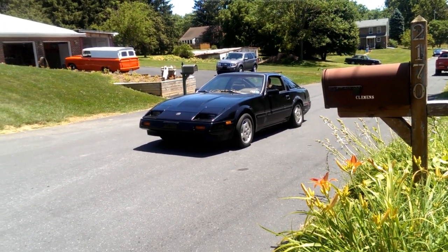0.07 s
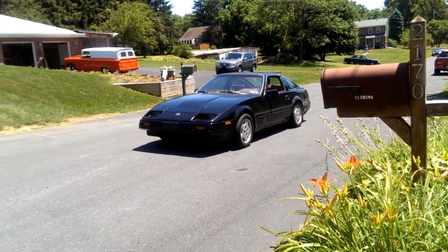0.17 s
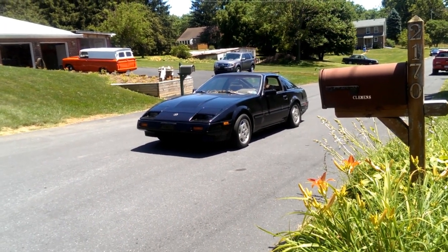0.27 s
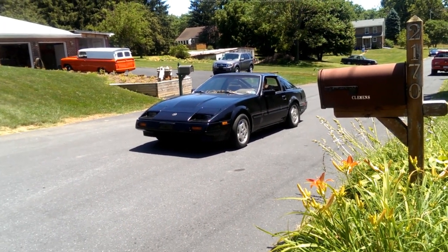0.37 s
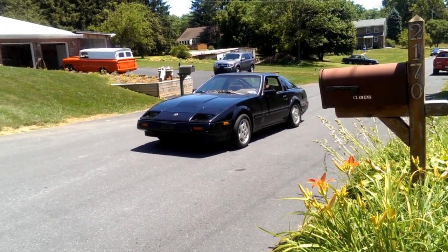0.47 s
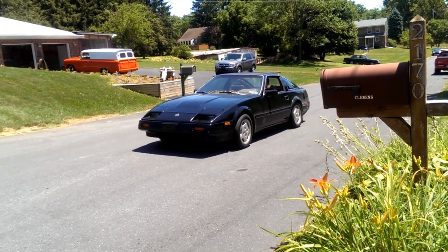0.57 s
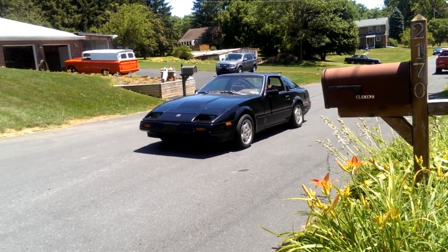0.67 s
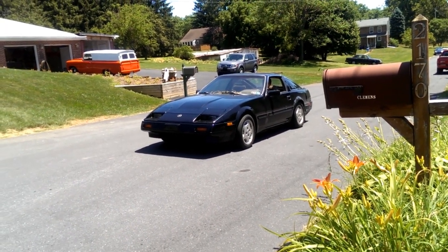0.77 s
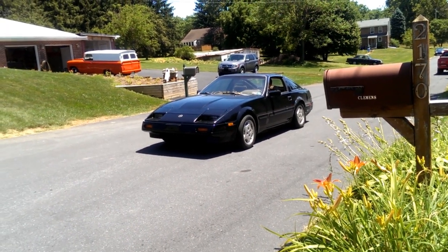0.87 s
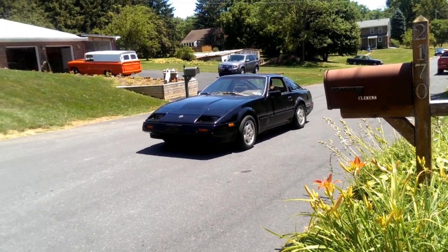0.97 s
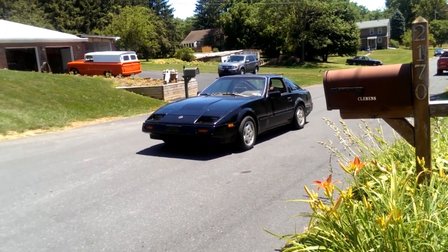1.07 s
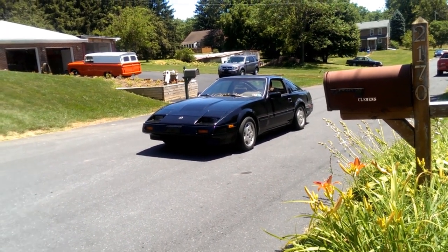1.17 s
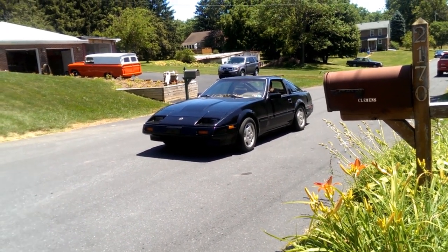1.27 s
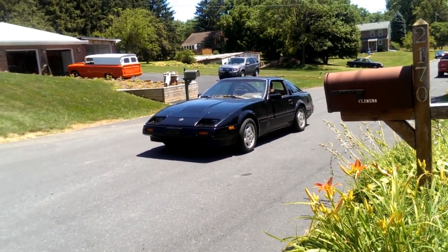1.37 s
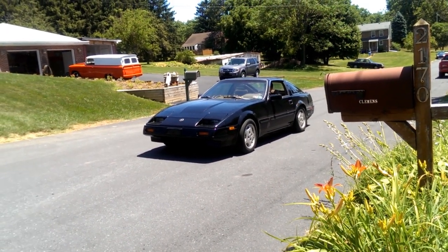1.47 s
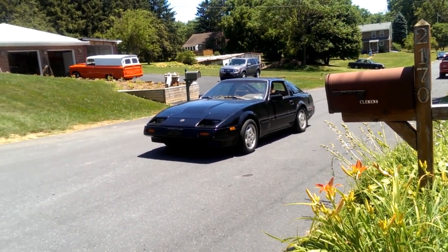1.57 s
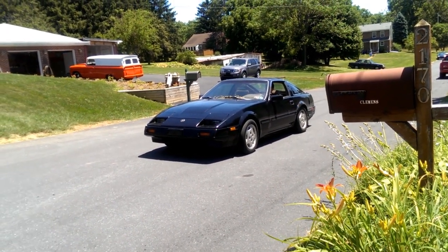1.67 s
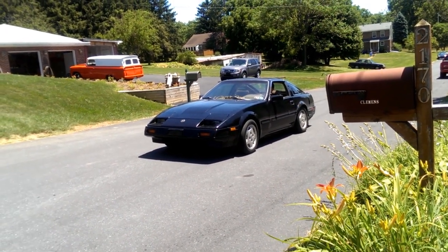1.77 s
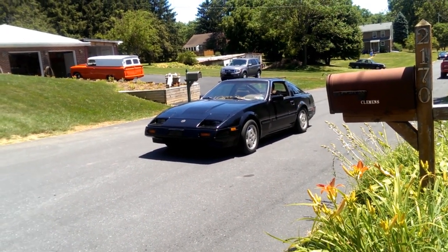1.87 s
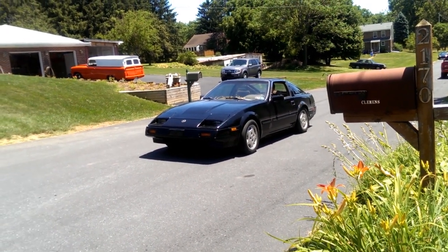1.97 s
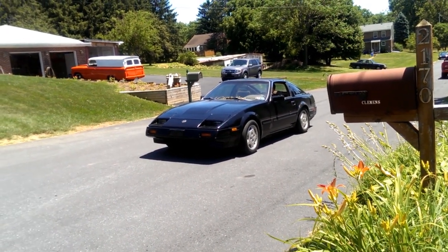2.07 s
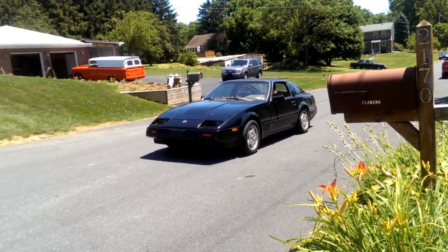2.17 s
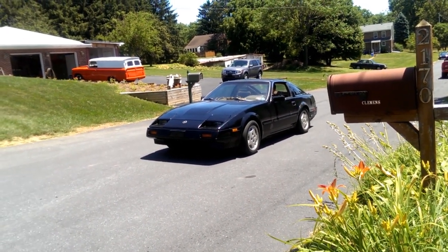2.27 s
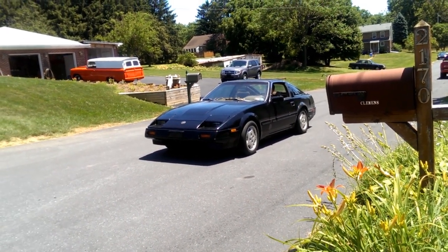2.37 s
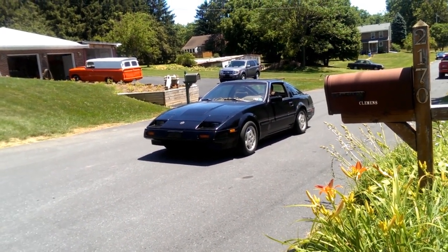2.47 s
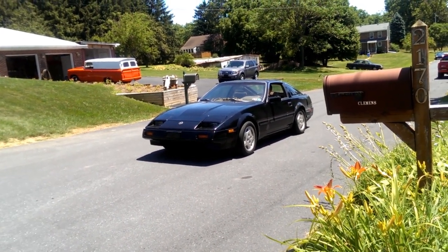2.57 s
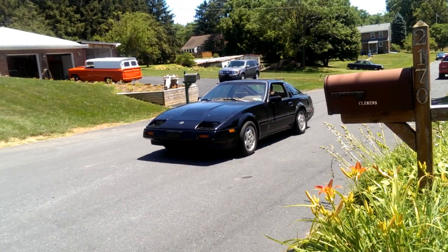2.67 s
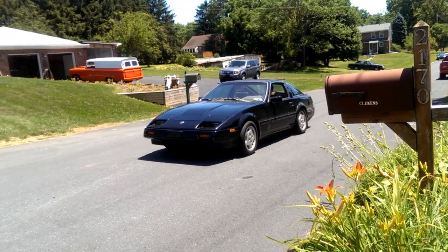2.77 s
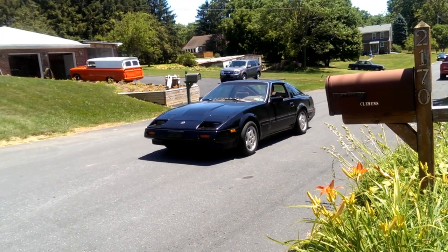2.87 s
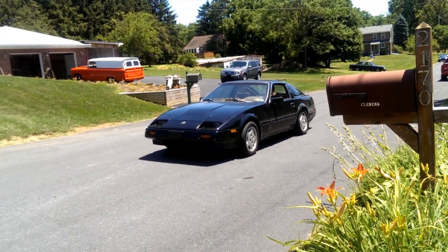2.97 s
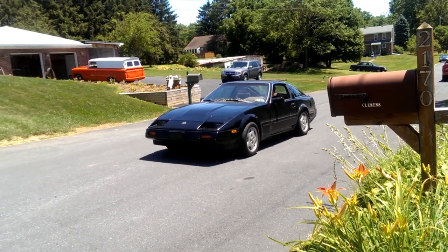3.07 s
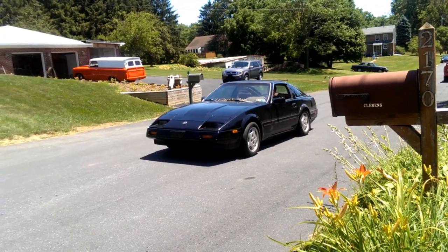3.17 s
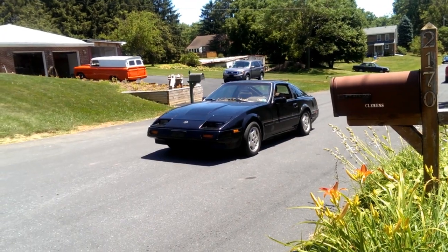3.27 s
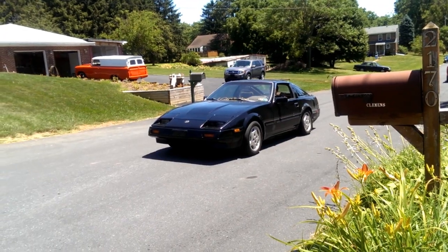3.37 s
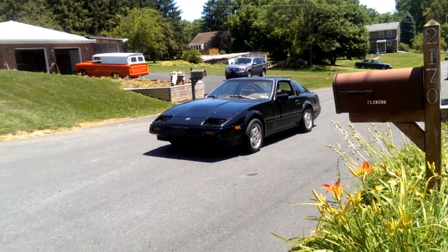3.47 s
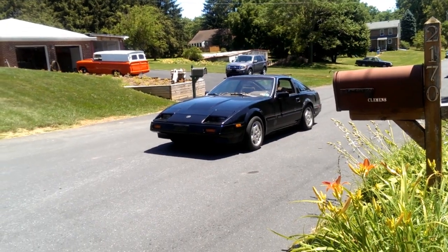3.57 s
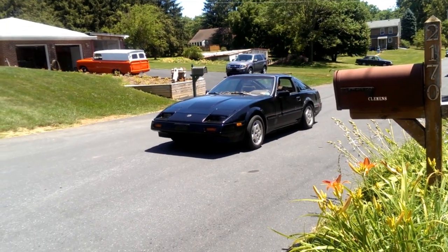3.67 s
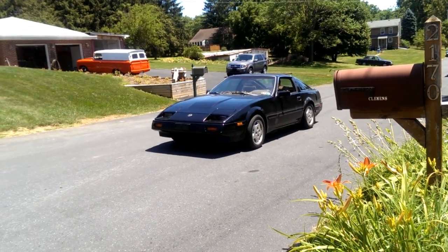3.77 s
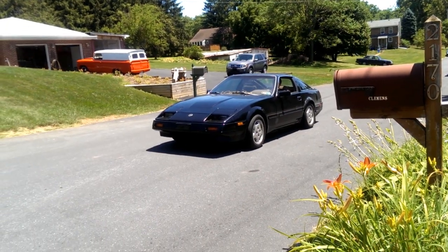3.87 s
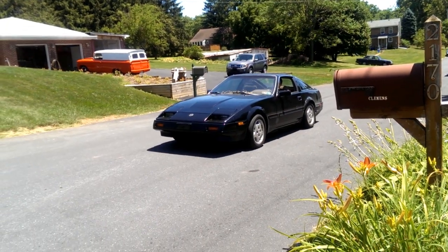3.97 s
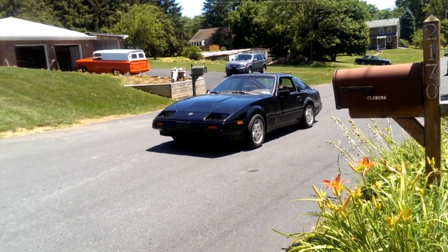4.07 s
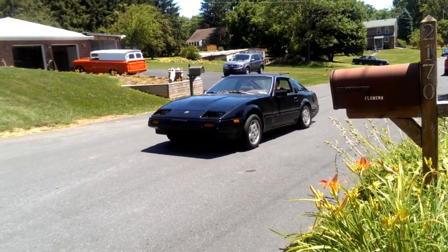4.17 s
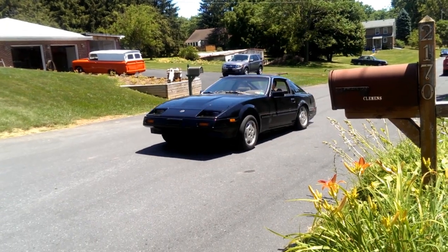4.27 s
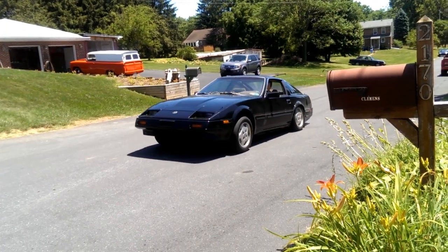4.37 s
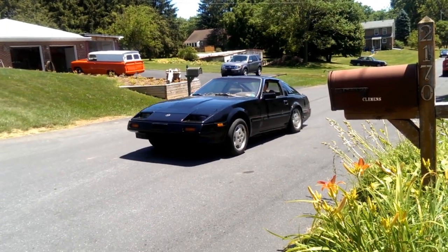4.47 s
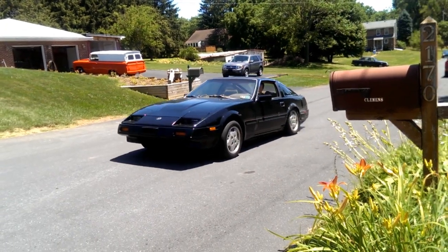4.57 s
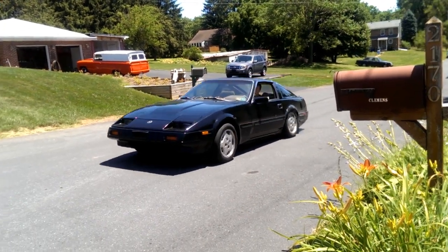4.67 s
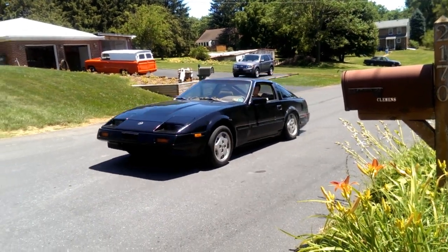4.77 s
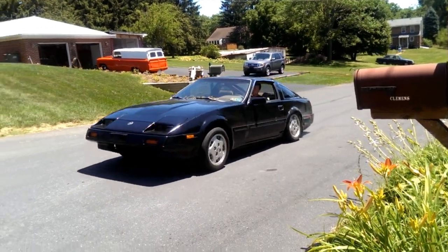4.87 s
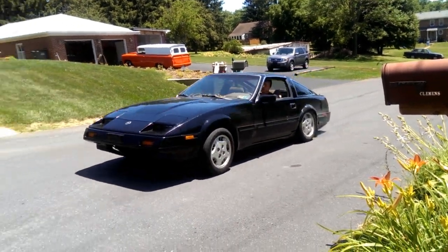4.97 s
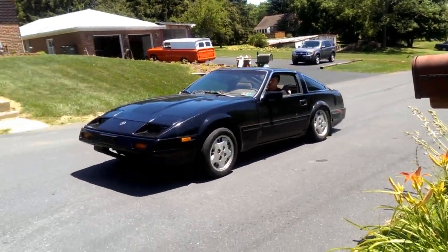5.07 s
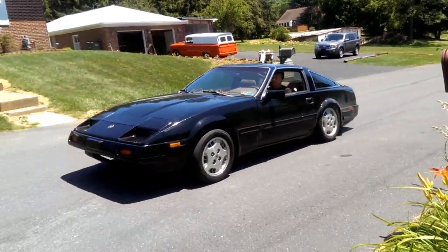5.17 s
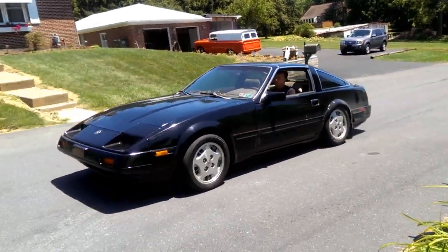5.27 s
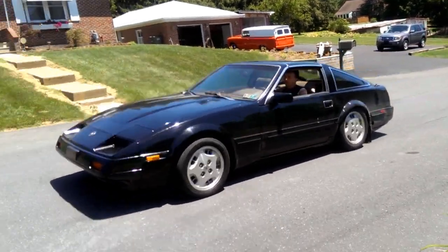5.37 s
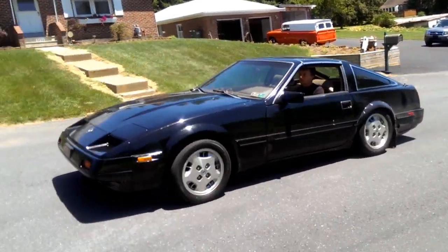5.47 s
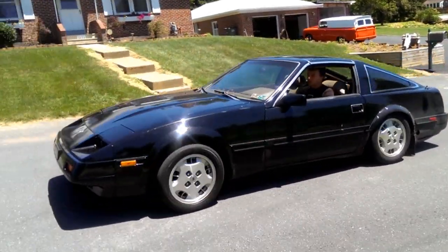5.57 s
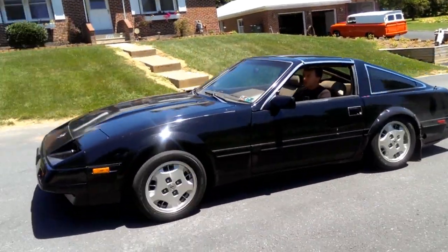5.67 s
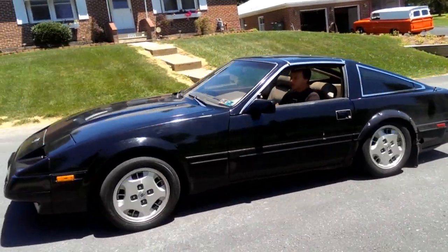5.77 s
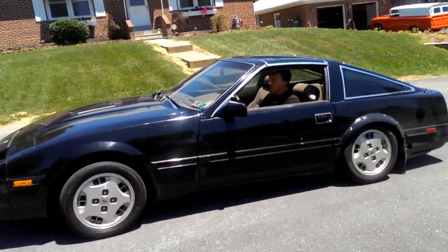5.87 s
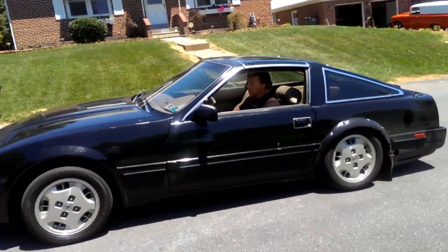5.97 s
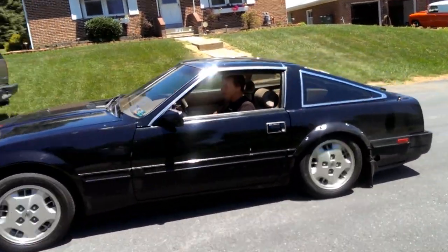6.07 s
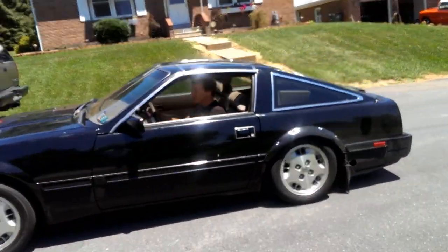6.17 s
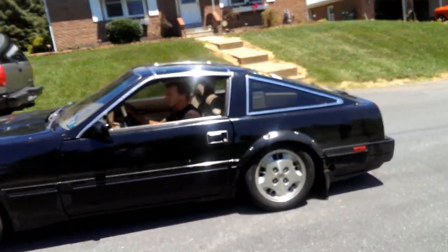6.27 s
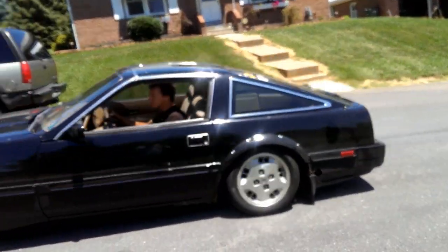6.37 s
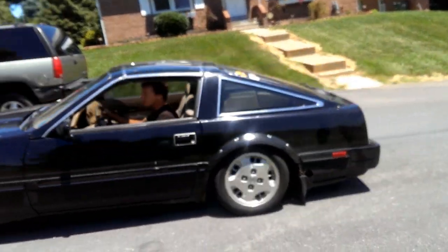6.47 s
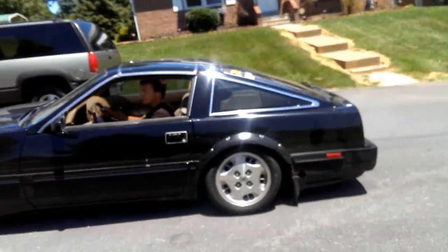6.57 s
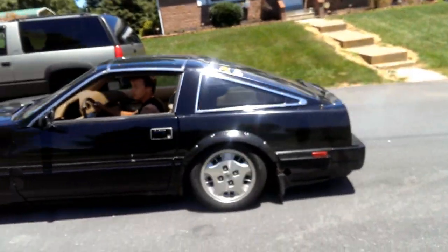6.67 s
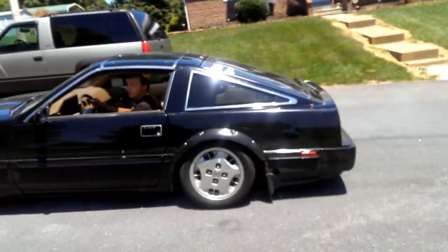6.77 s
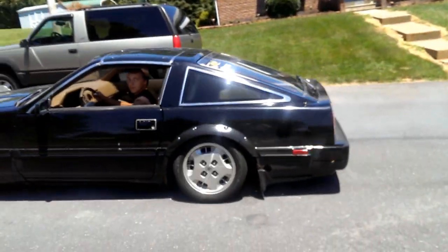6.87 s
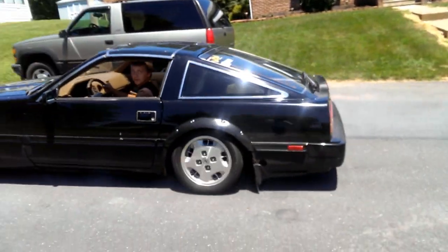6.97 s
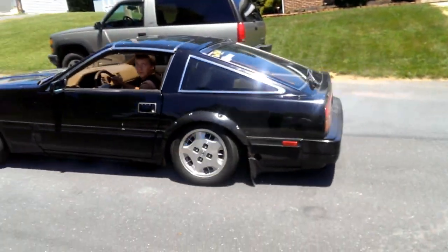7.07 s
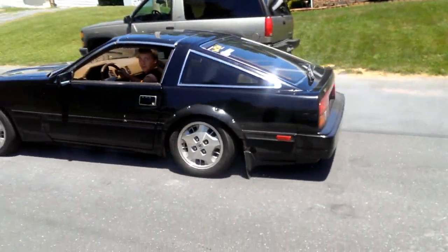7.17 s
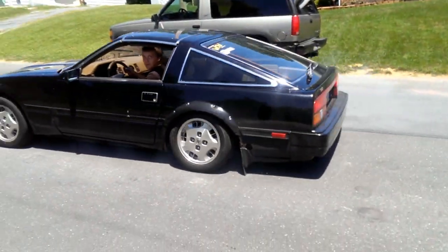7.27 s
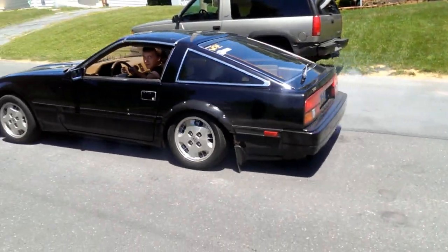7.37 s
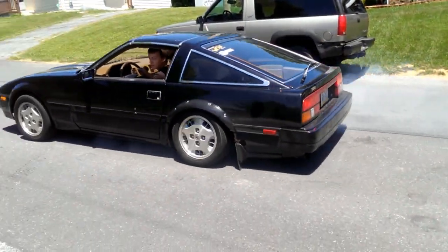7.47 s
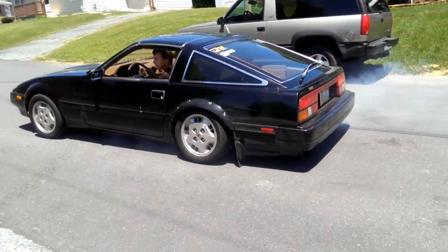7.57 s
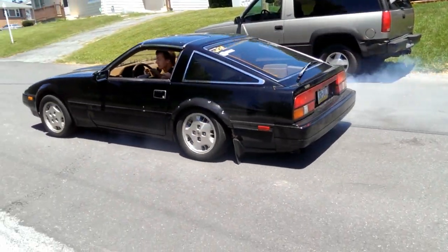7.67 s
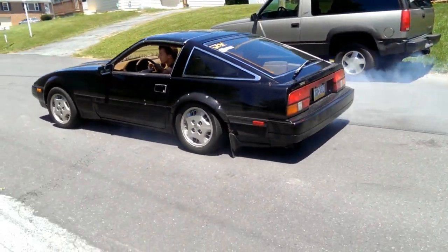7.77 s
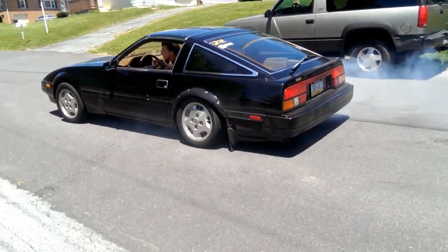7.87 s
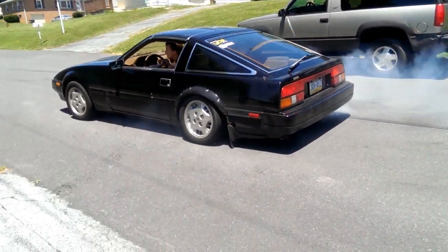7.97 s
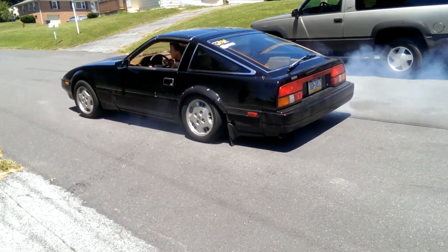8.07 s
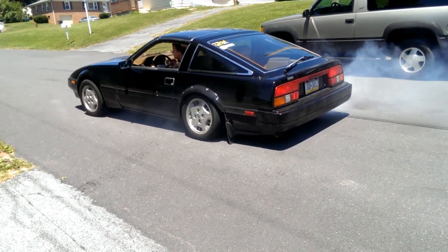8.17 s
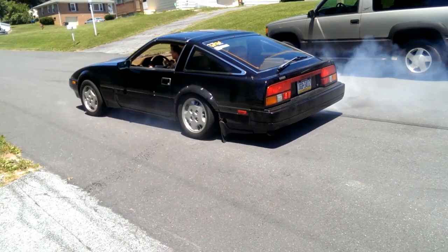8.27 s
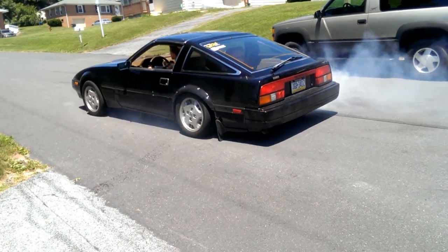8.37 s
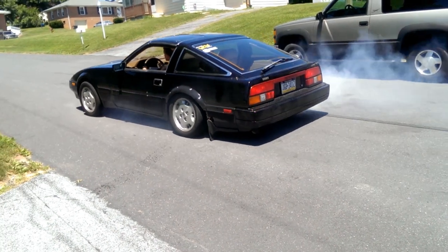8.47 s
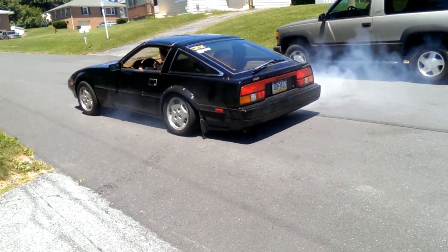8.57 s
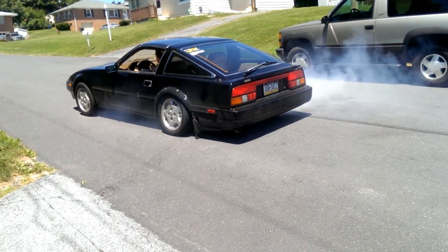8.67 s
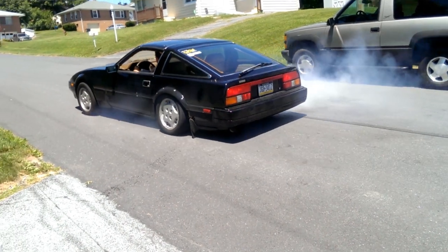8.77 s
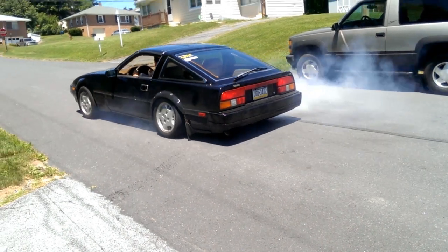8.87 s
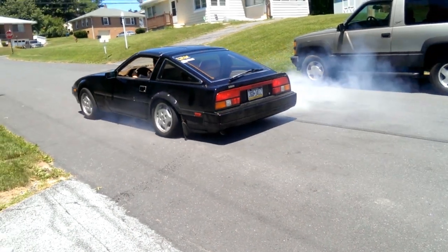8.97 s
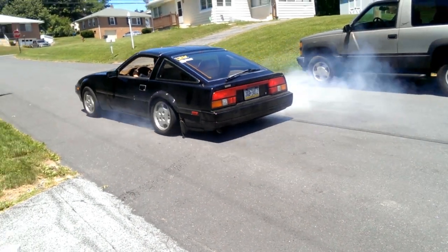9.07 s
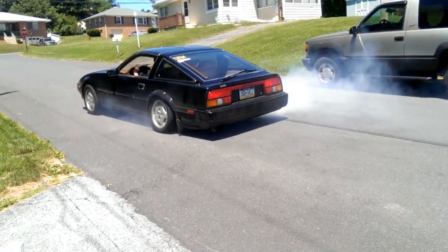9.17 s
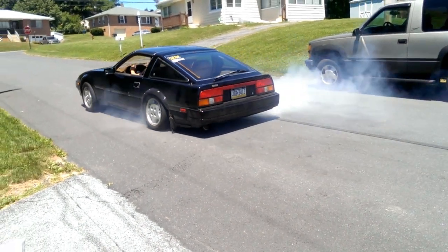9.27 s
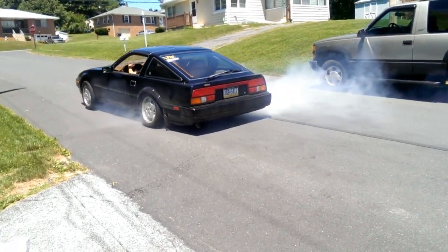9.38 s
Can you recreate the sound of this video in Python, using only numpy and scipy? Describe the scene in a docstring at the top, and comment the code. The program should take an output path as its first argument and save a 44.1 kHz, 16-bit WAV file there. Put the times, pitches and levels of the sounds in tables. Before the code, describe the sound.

A handheld phone outdoors on a quiet street, sound weighted heavily to the left. From 0 to 2.6 seconds a six-cylinder car idles softly and unevenly, with a small blip near 1 second, airy engine-bay hiss and faint low street rumble. From 2.7 it revs, dips, then climbs steadily until 4. At about 4.05 the clutch bites with low thuds and the level jumps: rubber hiss bursts out, and rough, short tyre chirps stutter between 4.2 and 5.05. The buzzing, raspy exhaust holds a high drone, rising slightly and swelling as the car passes around 6 to 7, with bright metallic edges and distorted peaks. From 7.3 the engine bogs and its pitch falls, the throttle pumping in throaty surges with crackling treble. A jolt and dip come near 8.05, the lowest growl near 8.5, then renewed surges, a drop near 9.2 and a rise at the end at 9.4.

```python
"""A six-cylinder coupe idles unevenly on a quiet street, revs up, drops the clutch and spins its tyres past a phone.
The exhaust is a stack of partials from two banks that pulse in turn; bursts of treble noise are its cracking gas.
Shaped noise makes the engine bay, the rubbing tyres, the gas flow and the street.
Short gliding tones make tyre chirps and driveline thuds. The phone's open left port overloads; the right is shaded.
"""
import sys
import numpy as np
from scipy import signal
from scipy.fft import rfft, irfft, next_fast_len
from scipy.io import wavfile
from scipy.ndimage import uniform_filter1d

SR = 44100
rng = np.random.default_rng(int(sys.argv[2]) if len(sys.argv) > 2 else 0)


def put_to_file(sound):
    """Save the sound as 16-bit audio at rate SR, in the file named by the first command-line argument."""
    columns = np.atleast_2d(sound).T  # one column per channel
    safe = np.clip(columns, -1, 1)
    whole_steps = np.round(safe * 32767)
    wavfile.write(sys.argv[1], SR, whole_steps.astype(np.int16))


N = 415422
STEP = 32  # samples between control points
T, SIZE = np.arange(N) / SR, next_fast_len(N)
HZ = np.maximum(np.fft.rfftfreq(SIZE, 1 / SR), 1)  # frequencies of the noise spectra
GRIP_S = 4.075  # the clutch bites
LEFT_DB = 5.2  # gain of the open left port

# How the cylinders differ, one row per turn of the banks; three turns make one engine cycle
# [rasp level/dB, crack level/dB]
CYLINDERS = [(3.5, 0.5), (-1, 8), (0, 2.5)]


def undb(db):
    """Turn decibels into an amplitude factor."""
    return np.exp(np.asarray(db) * (np.log(10) / 20))


def smooth(x):
    """Join control points with straight lines, giving one value per sample."""
    return np.interp(T, np.arange(len(x)) * STEP / SR, x)


def curves(table):
    """Turn each column after the time column into one value per sample."""
    s, *columns = np.transpose(table)
    return [np.interp(T, s, column) for column in columns]


def on_log(table, hz):
    """Read a spectrum table along a log-frequency axis."""
    table_hz, values = np.transpose(table)
    return np.interp(np.log(hz), np.log(table_hz), values)


def walk(rate):
    """A random wander: levels held for about 1 / rate seconds, then slewed twice; spread near 1."""
    hold = max(int(SR / STEP / rate), 1)
    steps = np.repeat(rng.standard_normal(N // STEP // hold + 2), hold)
    slewed = uniform_filter1d(uniform_filter1d(steps, hold), hold)
    return 1.237 * smooth(slewed)


def hiss(spectrum, low_hz, high_hz, gate=1, flicker_db=1.0):
    """Two-channel gated noise, set to rms 1 within low-high, then flickered in three wide bands."""
    # How alike the noise is at the two ports [f/Hz, likeness 0-1]
    port_likeness = [(60, 0.3), (130, 0.97), (290, 1), (640, 0.62), (1410, 0.8), (3100, 0.45), (6820, 0.38),
                     (15000, 0.68)]
    like = on_log(port_likeness, HZ)
    a, b = rfft(gate * rng.standard_normal((2, N)), SIZE)
    pair = np.array([a, like * a + np.sqrt(1 - like ** 2) * b])
    pair *= undb(on_log(spectrum, HZ))
    inside = (HZ > low_hz) & (HZ < high_hz)
    pair /= np.sqrt(2 * np.sum(np.abs(pair[0, inside]) ** 2)) / SIZE
    place = np.clip(np.log2(HZ / low_hz) + 1, 0, 2)
    total = 0
    for k in range(3):
        band = irfft(pair * np.clip(1 - abs(place - k), 0, 1), SIZE)[:, :N]
        total = total + undb(flicker_db * walk(18)) * band
    return total


def bursts(table, wobble, rise, rough_db=0):
    """One wavering oscillator that slides from pitch to pitch and swells at each row."""
    s, _, hz = np.transpose(table)
    pitch = np.interp(T, s + .012, hz) * (1 + wobble * walk(120))
    swell = np.zeros(N)
    for start, db, _ in table:
        begin = start - .002
        near = slice(int(begin * SR), int((start + 12 * rise) * SR))
        u = np.maximum(T[near] - begin, 0) / rise
        swell[near] = np.maximum(swell[near], undb(db) * u * np.exp(1 - u))
    return swell * undb(rough_db * walk(250)) * np.sin(2 * np.pi * np.cumsum(pitch) / SR)


def controls():
    """Pulse rate, levels of partials 2, 1 and 3, rasp, hiss and treble through the three stages."""
    # Uneven idle, then the rev-up
    # [t/s, bank pulse rate f/Hz, second, first and third partial level/dB, bay hiss level/dB]
    idle_table = [(0.0, 42, -28, -58, -56, -56), (0.02, 43.2, -33, -58, -42, -54),
                  (0.09, 42.2, -29.5, -59, -41, -60), (0.18, 43, -51, -54, -47, -60),
                  (0.3, 45.15, -40, -57, -40.5, -57.5), (0.54, 46.45, -47, -50, -46.5, -55.5),
                  (0.61, 46.5, -34, -59, -40, -56), (0.68, 49.2, -28, -57, -37, -52),
                  (0.74, 49.7, -45, -44, -42, -56), (0.87, 49.74, -37, -35, -41, -51),
                  (0.92, 51.8, -29, -34, -39, -47), (0.97, 55.5, -25.5, -27, -34, -38.5),
                  (1.05, 59.8, -26, -46, -32.5, -44), (1.1, 61.3, -36, -34, -36, -51),
                  (1.18, 59.4, -36, -32, -45, -48.5), (1.27, 57.3, -35, -49, -37, -52.5),
                  (1.39, 55.1, -48, -35, -52, -51.5), (1.48, 53.1, -41, -40, -42, -49.5),
                  (1.56, 52.4, -28, -38.5, -35, -51), (1.63, 54.3, -42, -49, -49, -50.5),
                  (1.75, 52.4, -49, -34, -44, -53), (1.84, 53.5, -27.5, -44, -37, -49),
                  (1.92, 54.6, -36, -50, -43, -51.5), (2.02, 55.6, -58, -38, -47, -53),
                  (2.19, 52.3, -44, -37, -42, -51.5), (2.22, 51.5, -31.5, -43, -37.5, -52),
                  (2.36, 52.95, -37, -54, -41.5, -51.5), (2.4, 53.3, -52, -40, -48, -53),
                  (2.49, 52.2, -36, -44, -39.5, -55.5), (2.64, 54, -33, -53, -46, -48.5),
                  (2.89, 61, -30, -45, -36, -53.5), (2.97, 60.3, -37, -37, -44, -54),
                  (3.04, 59.5, -44, -35, -50, -53), (3.19, 58.5, -33, -37, -45.5, -54.5),
                  (3.42, 63.4, -28, -40, -35, -51), (3.55, 68.5, -25.5, -54, -35.5, -44),
                  (3.7, 73.3, -26.5, -49, -41.5, -42.5), (3.79, 79, -29.5, -50, -38, -41.5),
                  (4.0, 87.9, -27.5, -59, -35.5, -41.5), (4.05, 86.4, -27, -23, -35, -38.5)]
    # Wheelspin past the phone
    # [t/s, bank pulse rate f/Hz, second, first and third partial level/dB, rasp level/dB, tyre hiss level/dB]
    spin_table = [(4.07, 91, -34, -27, -37, -33, -39), (4.1, 93, -19.5, -33, -29, -41, -22),
                  (4.15, 98.7, -21.5, -23, -29, -29, -24), (4.17, 97.6, -16.5, -32, -36, -32, -21.5),
                  (4.21, 94.2, -20.5, -28, -28, -33, -23.5), (4.3, 97.9, -17, -29, -33, -29, -22),
                  (4.53, 98.4, -25.5, -28, -30, -30, -22), (4.6, 99.8, -19, -29, -42, -26, -22),
                  (4.63, 102.4, -16.5, -30, -35, -27, -22), (4.71, 106.7, -25, -24, -33, -28, -22),
                  (4.74, 111.0, -21, -27, -42, -31, -22.5), (4.8, 115.9, -23, -30, -38, -24, -23.5),
                  (4.85, 110.8, -24, -28, -50, -26, -23.5), (4.89, 107.3, -21, -29, -33, -25, -22.5),
                  (4.93, 106.5, -25.5, -27, -34, -25.5, -22.5), (5.05, 107.7, -21.5, -25, -31, -26, -21.5),
                  (5.1, 108.8, -18.5, -24, -38, -25, -21.5), (5.21, 108.5, -17.5, -28, -31, -21.5, -22.5),
                  (5.42, 106.4, -20, -25, -37.5, -24.5, -22), (5.77, 105.8, -16, -23, -28.5, -22, -19),
                  (5.79, 106.1, -16, -25, -32, -23.5, -20), (5.96, 107.1, -14, -20, -21.5, -17.5, -19.5),
                  (6.19, 107.9, -15.5, -16.5, -24.5, -18.5, -19.5),
                  (6.41, 110.8, -13.5, -17.5, -22, -21.5, -21),
                  (6.51, 111.4, -13, -17, -22.5, -17.5, -20.5), (6.66, 112.1, -15, -16.5, -19.5, -16, -20),
                  (6.89, 114.5, -28.5, -14.5, -20, -15.5, -22.5), (7.22, 116.5, -12.5, -11, -23, -17, -24)]
    # The throttle is pumped while the engine bogs
    # [t/s, bank pulse rate f/Hz, second, first and third partial level/dB, rasp level/dB, treble level/dB]
    pump_table = [(7.27, 115, -15, -13, -25, -19, -24), (7.31, 114.9, -16.5, -16, -30, -21, -34),
                  (7.42, 113.2, -11.5, -11.5, -18, -14, -22), (7.48, 111.3, -13, -15.5, -25, -19, -31.5),
                  (7.55, 108.2, -11.5, -19, -25, -24, -39.5), (7.65, 106.4, -9, -11, -15, -15.5, -22.5),
                  (7.82, 103.3, -8, -12.5, -17.5, -22.5, -37), (7.91, 102.9, -8.5, -14, -14.5, -15, -24),
                  (8.01, 103.3, -10, -13, -18, -17.5, -28.5), (8.04, 101.5, -9, -22, -18, -25, -41),
                  (8.05, 99.4, -18, -39, -22, -29, -42), (8.07, 98.6, -10, -25, -23, -25.5, -54),
                  (8.11, 92.5, -9.5, -24, -20.5, -34, -65), (8.2, 90.7, -6.5, -14.5, -12.5, -15.5, -33.5),
                  (8.32, 87.5, -10, -17.5, -16, -27, -51), (8.45, 83.65, -11, -18, -17, -21, -44),
                  (8.51, 83.3, -11, -17, -14.5, -17, -33), (8.69, 89.35, -8, -14.5, -13, -18.5, -28.5),
                  (8.77, 91.3, -11.5, -16, -17.5, -20.5, -39), (8.83, 89.6, -8.5, -23, -16.5, -32.5, -51),
                  (8.89, 88.4, -11, -19, -17, -24.5, -37), (8.92, 89.46, -10, -16, -15, -20.5, -30),
                  (9.07, 93.3, -11, -17.5, -15, -20.5, -25.5), (9.1, 92.85, -11, -17, -16.5, -18.5, -26.5),
                  (9.17, 91, -12.5, -23, -21, -35.5, -54), (9.2, 88.7, -14, -25, -20.5, -35, -53),
                  (9.26, 87.5, -12, -20, -15, -27, -36), (9.35, 91, -14, -17, -18, -22, -28.5),
                  (9.4, 94.8, -14.5, -19, -19, -22.5, -34.5), (9.42, 94.5, -13, -16, -20, -26, -37)]

    s, hz, second, first, third, bay = np.transpose(idle_table)
    # rasp partly follows the second partial, and grows with any bay hiss above -50 dB
    rasp = -52 + 0.15 * (second + 35) + np.maximum(bay + 50, 0)
    # treble follows the hiss, and rises when the first partial takes over
    treble = bay - 9 + 0.19 * (first - second)
    idle = [s, hz, second, first, third, rasp, bay, treble]

    spin = np.transpose(spin_table)
    s, tyres = spin[0], spin[-1]
    nearing_db_per_s = 3.5  # treble grows as the car draws level
    spin = [*spin, tyres - 10 + nearing_db_per_s * (s - GRIP_S)]

    s, hz, second, first, third, rasp, treble = np.transpose(pump_table)
    open_treble_db, open_hiss_db = -29, -23.5  # throttle open
    fade_db_per_s, hiss_share = 2.7, 0.32  # the car leaves; hiss partly follows the treble
    hiss_db = open_hiss_db + hiss_share * (treble - open_treble_db) - fade_db_per_s * (s - s[0])
    pump = [s, hz, second, first, third, rasp, hiss_db, treble]
    return curves(np.hstack([idle, spin, pump]).T)


def partials(hz, second, first, third, rasp, spinning):
    """Levels of partials 1 to 10: the pipe colours them, moving gaps cut them, the upper ones waver."""
    # Colour the pipe gives partials 4 to 10: at idle, under load, and under load from behind [f/Hz, level/dB]
    pipe_idle = [(160, -1), (200, -7), (240, -10.5), (285, -4.5), (340, -11.5), (450, -5.5), (600, -10),
                 (900, -16)]
    pipe_load = [(370, -1), (450, -5.5), (540, -4.5), (640, -5.5), (750, -7), (860, -6), (1000, -10.5),
                 (1200, -10)]
    pipe_tail = [(330, -9), (400, -4), (460, -7), (540, -10.5), (620, -3.5), (720, -2), (850, -5),
                 (1000, -8), (1200, -18)]
    # Two gaps that move through the stack, probably cut by echoes off the road and parked cars
    # [t/s, low gap f/Hz, its depth level/dB, high gap f/Hz, its depth level/dB]; a negative depth boosts
    gap_table = [(0, 336, 10, 400, 17), (1, 345, 12, 474, 10), (2.5, 339.5, 13, 480, 6.5),
                 (3.4, 430, 3, 560.7, 1), (3.8, 472.8, 6, 721, 6), (4.0, 601, 12, 802, 8),
                 (4.1, 559.8, 7, 614, -8), (4.5, 611.3, 2, 778, 30), (4.9, 430.4, 6, 823, 18),
                 (5.25, 429.3, 5, 681, 17), (5.5, 425, 5.5, 920, 8), (5.85, 423.8, 25, 951.3, 7),
                 (6.07, 427.5, 5, 897, 10), (6.17, 480, 8, 760, 3), (6.3, 544.7, 26, 987, 6),
                 (6.55, 449.8, 6, 1123, 1), (6.86, 454.2, 10, 1030, 23), (7.1, 462.4, 8, 1020, 3),
                 (7.22, 520, 7, 1152, 0), (7.45, 568.3, 20, 1018, 9), (7.6, 629.3, 13, 1040, 1),
                 (7.7, 620.4, 2, 1060, 0), (7.85, 621, 5, 931.6, 10), (7.97, 420, 14, 1040, 10),
                 (8.05, 509.8, 10, 1020, 10), (8.2, 540.4, 8, 831, 16), (8.5, 465.6, 16, 750, 16.5),
                 (8.75, 545.3, 14, 803.6, 6), (8.95, 528.7, 3, 850.3, 7), (9.08, 501, 0, 935, 9),
                 (9.25, 525, 2, 883.4, -3), (9.4, 465, 15, 664, 3)]
    low_width_hz, high_width_hz = 51, 76
    bass_hz, edge_hz = 281, 446  # below bass the third partial leads, above edge the rasp does
    turns_s, turn_length_s = 7.2, 1.29  # the tail swings towards the phone
    wander_db = 2.0  # each upper partial wavers alone

    out = [first, second, third]
    low_hz, low_db, high_hz, high_db = (c[::STEP] for c in curves(gap_table))
    hz, third, rasp, spinning = (c[::STEP] for c in (hz, third, rasp, spinning))
    behind = np.clip((T[::STEP] - turns_s) / turn_length_s, 0, 1)
    for k in range(4, 11):
        f = k * hz
        edge = np.clip((f - bass_hz) / (edge_hz - bass_hz), 0, 1)
        loaded = (1 - behind) * on_log(pipe_load, f) + behind * on_log(pipe_tail, f)
        pipe = (1 - spinning) * on_log(pipe_idle, f) + spinning * loaded
        low_gap = low_db * np.exp(-((f - low_hz) / low_width_hz) ** 2)
        high_gap = high_db * np.exp(-((f - high_hz) / high_width_hz) ** 2)
        leader = (1 - edge) * third + edge * rasp
        out.append(smooth(leader + pipe - low_gap - high_gap + wander_db * edge * walk(11)[::STEP]))
    return np.array(out)


def firings(hz):
    """Count the turns of the banks at a slightly unsteady rate, and draw four chances for each turn."""
    turns = np.cumsum(hz * (1 + 0.00186 * walk(30))) / SR
    cycle = turns.astype(int)
    return turns, cycle, rng.standard_normal((cycle[-1] + 1, 4))


def exhaust_tone(hz, partial_db, lag, scatter_db, turns, cycle, chance):
    """Partials of two pulse trains, the second lagging, whose pressure rises slowly and drops fast."""
    # Spectrum of the partials above the tenth [f/Hz, level/dB relative to partials 8 to 10]
    rasp_spectrum = [(300, -7), (700, -72), (1000, -11), (1300, -6.5), (1600, -15.5), (1900, -13),
                     (2400, -16), (3200, -34)]
    # Groups of high partials that swell for a moment
    # [t/s, length/s, centre f/Hz, width f/Hz, level/dB]
    swell_table = [(5.249, 0.13, 1400, 120.8, -1), (5.466, 0.29, 1374, 120.8, 10),
                   (6.202, 0.23, 1421, 144.3, 10.5), (6.555, 0.074, 1877, 131.9, 9),
                   (6.711, 0.067, 1859, 161.3, 15), (6.857, 0.065, 1360, 129.8, 10),
                   (6.932, 0.12, 2438, 200, 11)]

    # every firing has its own strength
    size = scatter_db * uniform_filter1d(chance[cycle, :2].T, 200, axis=1)
    # cylinders differ, which adds lines between the partials
    rasp_db = uniform_filter1d(np.transpose(CYLINDERS)[0, cycle % 3], 200)
    top_db = 10 * np.log10(np.mean(undb(partial_db[7:]) ** 2, axis=0))
    upper_db = rasp_db + top_db + 1.6 * size[1]  # sharp edges scatter most
    drifts = [1.3 * walk(7) for _ in range(8)]  # neighbouring partials drift together
    tone, angle = 0, 2 * np.pi * (turns % 1)
    for k in range(1, 27):
        # phase of the two banks added, the second at 0.7 of the first
        bank_phase = smooth(np.angle(1 + .7 * np.exp(-2j * np.pi * k * lag[::STEP])))
        if k <= 10:
            db = partial_db[k - 1] + size[0] + rasp_db * (k > 3)
        else:
            db = upper_db + smooth(on_log(rasp_spectrum, k * hz[::STEP]))
            db = db + drifts[k // 4] + 1.2 * walk(25)
            for s, length, centre_hz, width_hz, swell_db in swell_table:
                near = slice(int((s - 2 * length) * SR), int((s + 2 * length) * SR))
                in_time = ((T[near] - s) / length) ** 2
                in_pitch = ((k * hz[near] - centre_hz) / width_hz) ** 2
                db[near] += swell_db * np.exp(-in_time - in_pitch)
        tone = tone + np.sqrt(2) * undb(db) * np.cos(k * angle + bank_phase + np.pi / 4)
    return tone


def gas_cracks(hz, lag, turns, cycle, chance):
    """Loudness curve of gas cracking out just before each pressure drop, loud or faint by chance."""
    crack_db = np.transpose(CYLINDERS)[1, cycle % 3]
    crack = 0
    for bank in range(2):
        since = (turns + .07 - bank * lag) % 1 / hz  # seconds since this bank last cracked
        crack = crack + undb(4.0 * chance[cycle, 2 + bank] + crack_db) * np.exp(-since / .0012)
    return crack / np.sqrt(uniform_filter1d(crack ** 2, SR // 4))


def engine_bay():
    """Fan and air of the engine bay, as steady-coloured noise."""
    # Spectrum of the bay [f/Hz, level/dB per Hz]
    bay_spectrum = [(30, -34), (100, -28), (300, -15.5), (400, -39), (560, -18), (900, -30), (1500, -27),
                    (2750, -26), (3500, -29), (4500, -37.5), (7000, -53), (12000, -92)]
    return hiss(bay_spectrum, 1500, 4500)


def air_treble(gate):
    """Treble noise that partly cracks with the exhaust pulses and flickers strongly."""
    # Spectrum of the treble, with the peak of the microphone port [f/Hz, level/dB per Hz]
    air_spectrum = [(2350, -41), (4000, 0), (5250, -5.5), (7910, -8), (9820, -6.5), (12300, 3),
                    (15600, -17.5)]
    return hiss(air_spectrum, 8000, 15000, gate, 2.0)


def street_rumble():
    """Distant rumble of the street, as quiet low noise."""
    # Spectrum of the street [f/Hz, level/dB per Hz]
    street_spectrum = [(25, -23), (60, 9), (200, 4.5), (330, -12), (600, -3), (900, -10.5), (1500, -21),
                       (5000, -37.5)]
    return undb(-45) * hiss(street_spectrum, 75, 1000)


def driveline_thuds():
    """Jolts of the driveline, as short low tones with an unsteady pitch."""
    # Thuds [t/s, level/dB, f/Hz]
    jolt_table = [(4.03, -25, 85.17), (4.066, -20, 95), (8.045, -19, 60)]
    return bursts(jolt_table, wobble=0.108, rise=0.0057)


def tyre_scrub(gate):
    """Rubber scrubbing the road, as noise that pulses half as deep as the treble."""
    # Spectrum of the rubber [f/Hz, level/dB per Hz]
    scrub_spectrum = [(300, -24), (600, 0), (850, -5), (1100, -0.5), (1500, -2.5), (2000, 0.5), (3500, -2),
                      (5000, -10.5), (7000, -18.5), (12000, -21)]
    return hiss(scrub_spectrum, 1500, 4500, (1 + gate) / 2)


def gas_roar(partial_db, crack, spinning):
    """Gas flow noise under load: it follows partials 4 to 10, and a share comes with the cracks."""
    # Spectrum of the gas flow [f/Hz, level/dB per Hz]
    roar_spectrum = [(25, -3), (50, -12), (100, -14.5), (200, -5), (400, -5), (650, -3), (900, -1.5),
                     (1400, -23.5)]
    flow = np.sqrt(uniform_filter1d(np.sum(undb(partial_db[3:]) ** 2, axis=0), SR // 10))
    pulsing = 1 + 0.14 * (crack - 1)
    roar_db = -10  # relative to partials 4 to 10
    return spinning * flow * undb(roar_db) * hiss(roar_spectrum, 90.5, 1400, pulsing)


def tread_squeal():
    """Tread chirps: rough tones in a main mode and an upper mode, each with a wavering pitch."""
    # Chirps of the main mode, then of the upper mode [t/s, level/dB, f/Hz]
    chirp_table = [(4.1804, -22, 1058), (4.2306, -22, 990), (4.3495, -17, 1080), (4.3894, -26, 1070),
                   (4.4443, -19, 1041), (4.4707, -21, 1086), (4.5067, -32, 1134), (4.5283, -14.5, 1094),
                   (4.5494, -31, 1112), (4.584, -17, 1039), (4.6119, -23, 1028), (4.662, -20, 1027),
                   (4.6989, -23, 1025), (4.8519, -24, 1095), (4.8842, -18, 1072), (4.931, -24, 1195),
                   (4.9624, -21, 1102), (5.0477, -25, 1026)]
    high_chirp_table = [(4.4029, -18, 1898), (4.4333, -19, 1955), (4.575, -23, 2010)]
    low = bursts(chirp_table, wobble=0.0286, rise=0.011, rough_db=2.5)
    high = bursts(high_chirp_table, wobble=0.014, rise=0.011, rough_db=2.5)
    return low + high


def scene():
    """Exhaust tone and roar, bay and tyre hiss, treble with gas cracks, chirps, thuds and the street."""
    # How the two exhaust banks behave
    # [t/s, lag of second bank/cycles, scatter per cycle level/dB, share of treble that cracks 0-1]
    bank_table = [(0, 0.35, 1, 0.13), (3.0, 0.43, 2.5, 0), (3.5, 0.43, 1, 0.1), (4.3, 0.29, 1, 0.28),
                  (6.3, 0.38, 1.9, 0.29), (7.2, 0.37, 2, 0.22), (7.8, 0.38, 1.3, 0.56),
                  (8.5, 0.39, 0.8, 0.87), (9.42, 0.35, 1.1, 0.65)]
    hz, second, first, third, rasp, hiss_db, treble_db = controls()
    spinning = np.clip((T - GRIP_S) / 0.0099, 0, 1)  # from idle to wheelspin in about 10 ms
    partial_db = partials(hz, second, first, third, rasp, spinning)
    lag, scatter_db, cracking = curves(bank_table)
    turns, cycle, chance = firings(hz)
    tone = exhaust_tone(hz, partial_db, lag, scatter_db, turns, cycle, chance)
    crack = gas_cracks(hz, lag, turns, cycle, chance)
    gate = np.sqrt(1 - cracking + cracking * crack ** 2)
    mids = (1 - spinning) * engine_bay() + spinning * tyre_scrub(gate)
    noise = undb(hiss_db) * mids + undb(treble_db) * air_treble(gate) + street_rumble()
    return tone + noise + driveline_thuds() + gas_roar(partial_db, crack, spinning) + tread_squeal()


def record(dry):
    """The left port flattens loud peaks below the high treble, the right one is shaded; the top is cut."""
    # Loss of the right port, shaded by the hand [f/Hz, loss level/dB]
    right_loss = [(60, 19), (110, 16), (200, 15.5), (380, 17.5), (700, 16.5), (1290, 17), (2380, 16),
                  (4400, 14.5), (8120, 6.5), (15000, 6)]
    ceiling, top_hz = .84, 15700
    loud = undb(LEFT_DB) * dry[0]
    body = signal.sosfiltfilt(signal.butter(2, 6000, fs=SR, output="sos"), loud)
    high_treble = loud - body
    left = np.clip(ceiling * np.tanh(body / ceiling) + high_treble, -.92, .92)
    right = irfft(rfft(dry[1], SIZE) * undb(LEFT_DB - on_log(right_loss, HZ)), SIZE)[:N]
    low_pass = signal.ellip(12, .2, 80, top_hz, fs=SR, output="sos")
    return np.clip(signal.sosfilt(low_pass, [left, right]), -1, 1)


dry = scene()
out = record(dry)
put_to_file(out)
```